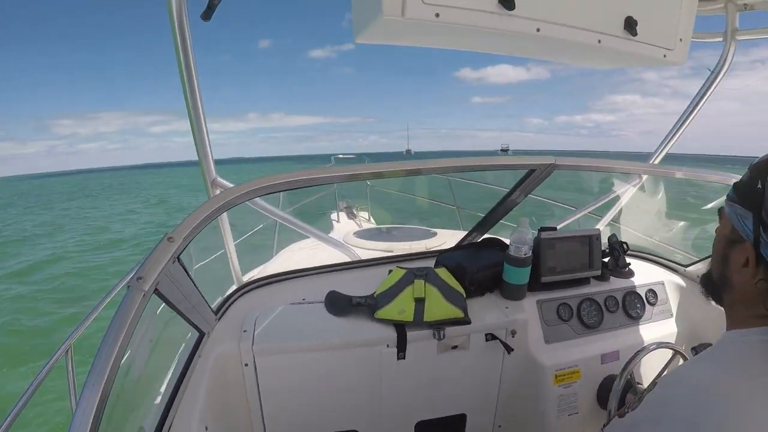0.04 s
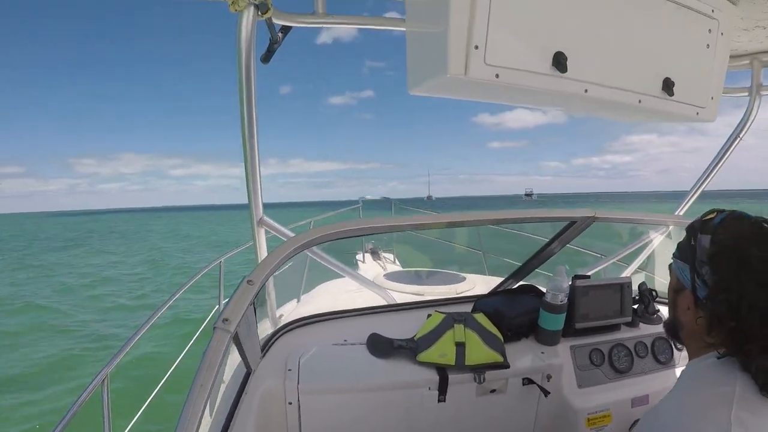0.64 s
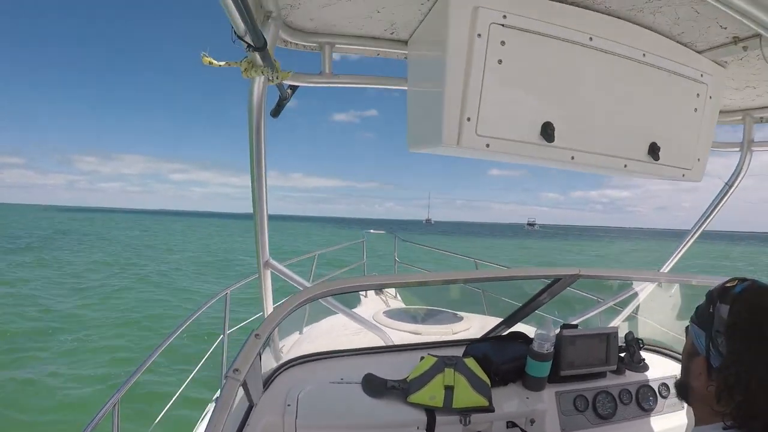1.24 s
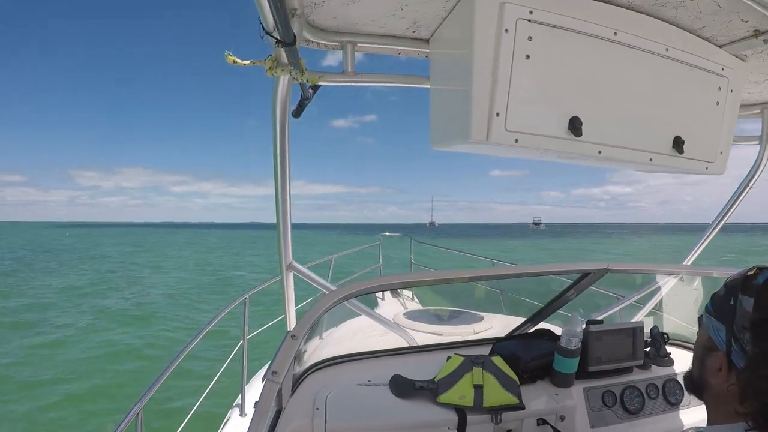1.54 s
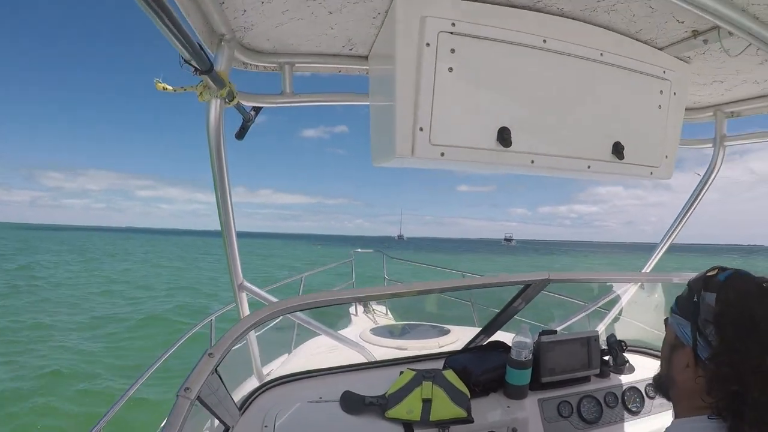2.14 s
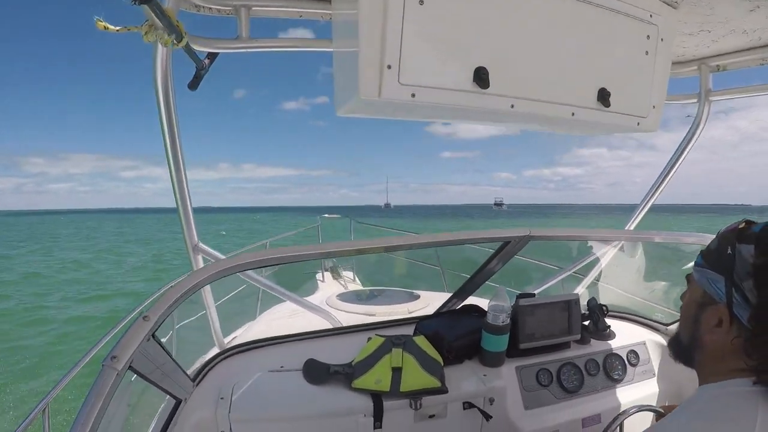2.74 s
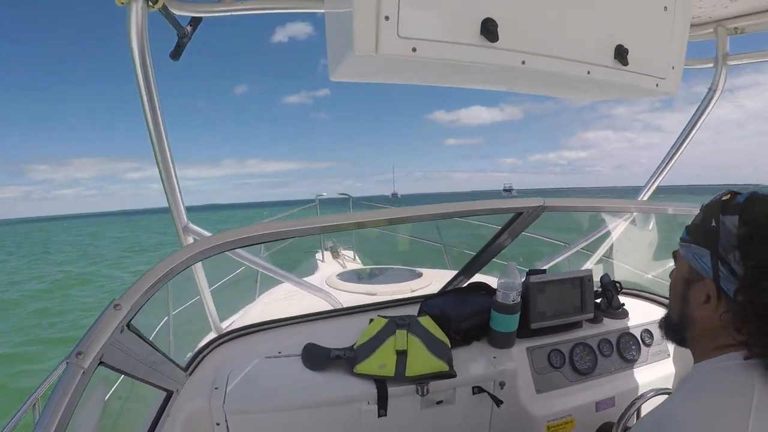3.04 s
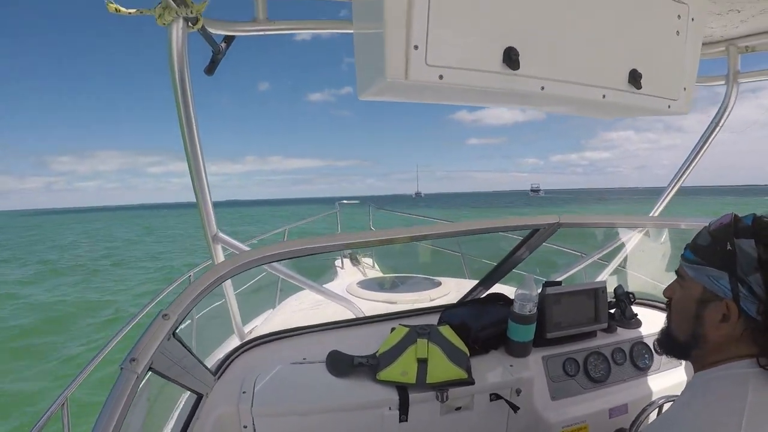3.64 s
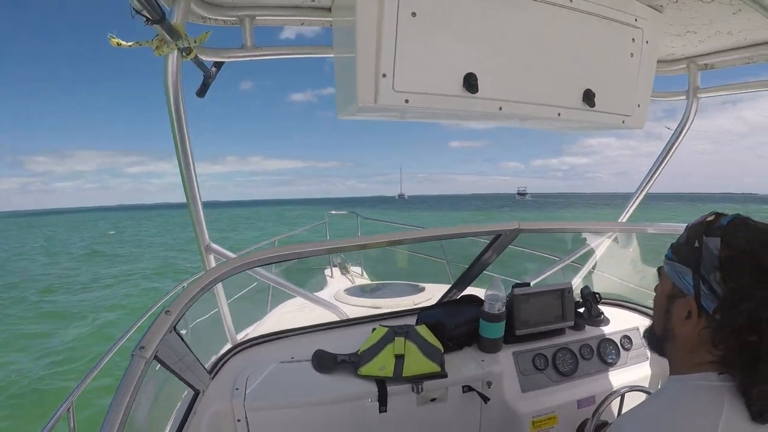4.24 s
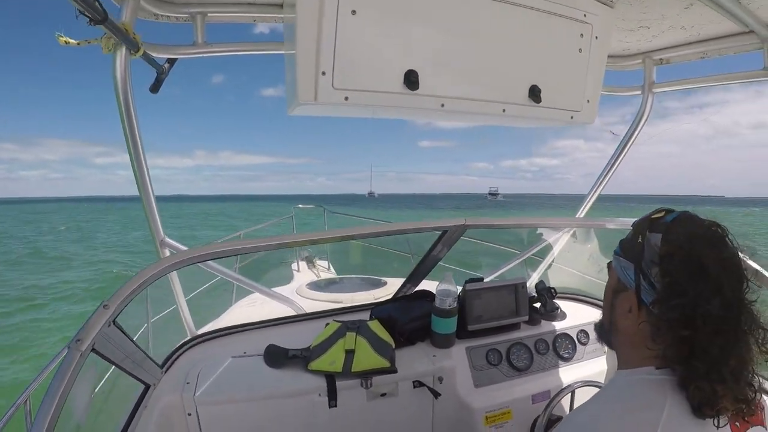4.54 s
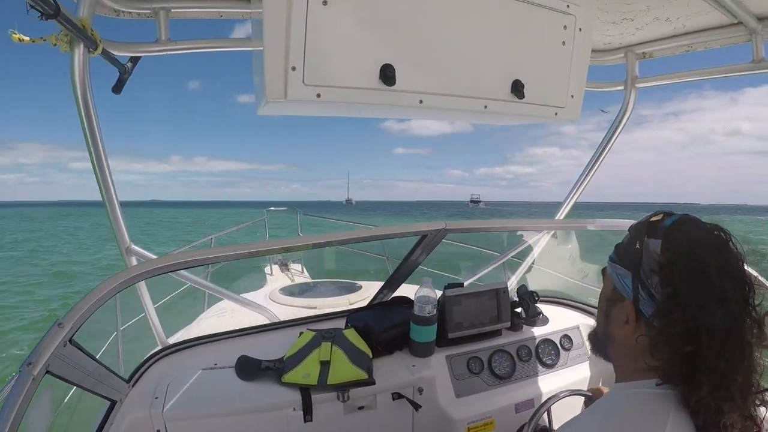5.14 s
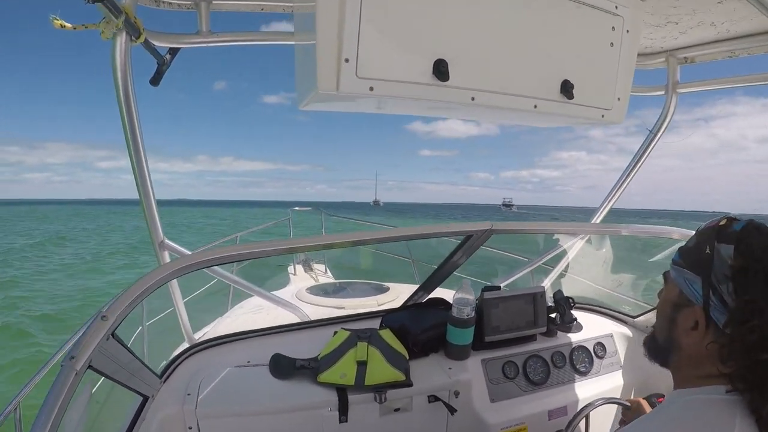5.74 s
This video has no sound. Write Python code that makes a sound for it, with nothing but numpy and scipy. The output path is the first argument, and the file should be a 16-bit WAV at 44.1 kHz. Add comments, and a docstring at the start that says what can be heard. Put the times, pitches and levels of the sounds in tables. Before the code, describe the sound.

A motorboat runs at speed over light chop for about six seconds, heard from one microphone behind the windscreen. Low wind rumble is the closest and loudest sound throughout. In the first half second it breaks into quick ragged thumps and crackles, then it eases, with a brief lull around 1.6 seconds. From about 2.5 seconds the buffeting grows harder and denser, with strong gusts near 2.7, 3.5, 4.6 and 5.4 seconds, and it carries on to the end. Further back, the engine holds a steady low exhaust drone with a thin, fluttering gear whine above it, which comes forward around 1, 4 and 5.4 seconds. Water rushes evenly along the hull the whole time. Spray from the bow adds a softer high hiss that swells quickly and falls away, most clearly near 1, 1.7, 2.7 and 4.4 seconds.

```python
"""Wind rumbles on one microphone under the hardtop of a motorboat running at speed over light chop.
The microphone sits behind the windscreen; whenever it loses that shelter, eddies strike it and
the wind tears into short ragged buffets. Further back, the engine's gears whine over the exhaust
drone, water rushes along the hull, and spray thrown up by the bow hisses in swells."""
import sys
import numpy as np
from scipy import signal
from scipy.fft import rfft, irfft, next_fast_len
from scipy.io import wavfile
from scipy.ndimage import uniform_filter1d

SR = 44100
rng = np.random.default_rng(int(sys.argv[2]) if len(sys.argv) > 2 else 0)


def materialize(psi):
    """Save the field psi as 16-bit PCM at rate SR to the path in sys.argv[1].

    A 1-D psi becomes a single channel; in a 2-D psi each row is a channel.
    """
    bounded = np.clip(np.atleast_2d(psi).T, -1, 1)
    quanta = np.round(bounded * 32767).astype(np.int16)
    wavfile.write(sys.argv[1], SR, quanta)


N = 264145
TIME = np.arange(N) / SR
FFT_SIZE = 2 * next_fast_len(N // 2 + 1)
BIN_HZ = np.maximum(np.arange(FFT_SIZE // 2 + 1) * SR / FFT_SIZE, 1)

# Wind getting past the windscreen, relative to a full gust: time_s, level_db
GUST_CURVE = [(0, -13.5), (.22, -12), (.5, -19.5), (.75, -15), (1.38, -10), (1.47, -18.5), (1.62, -34),
              (1.72, -11.5), (2.2, -15.5), (2.7, -4.5), (3.1, -8.5), (3.55, -2.5), (4.1, -7.5), (4.48, -7),
              (4.62, 0.5), (5.13, -5), (5.4, -0.5), (6, -5.5)]
# Brief surges and lulls at the microphone: centre_s, rumble_db, buffet_db, half_width_s
SURGES_AND_LULLS = [(.66, -3, -3, .08), (0.857, -3, -9, 0.026), (1.091, -1, -1.5, 0.028),
                    (1.335, -0.5, 2.5, 0.12), (1.497, -4, -4.5, 0.052), (1.618, -4.5, -15, .03),
                    (2.69, -0.5, 6.5, 0.046), (3.026, -4.5, 2, 0.043), (3.096, -2.5, -7, 0.033),
                    (3.65, 1, -3, 0.026), (3.758, -2, -2.5, .025), (3.838, -3, -13, 0.043),
                    (4.08, -1, -7, .04), (4.207, -5, 2.5, .03), (4.282, -2.5, -6, 0.038),
                    (4.591, -2.5, 4, .04), (5.14, -6.5, -8, 0.026), (5.264, -2, 0.5, .05),
                    (5.412, -4, 4, 0.031), (5.713, 1, 2.5, 0.095), (5.924, 0.5, 0, .04)]
# The hardest eddies to hit the microphone: centre_s, crackle_db, thump_db, half_width_s, top_hz
HARD_EDDIES = [(0.037, -18.5, -21, 0.0025, 1490), (0.058, -25, -18.5, 0.013, 1600),
               (0.078, -36, -25, 0.0074, 1500), (0.086, -22, -16, 0.0035, 1470),
               (0.113, -24, -14, 0.0045, 1200), (0.128, -21, -18, 0.0037, 1050),
               (0.144, -13.5, -13, 0.0023, 990), (0.154, -16.5, -16.5, 0.0041, 1700),
               (0.18, -29, -8.5, 0.0036, 1800), (0.206, -19.5, -20, 0.0036, 1860),
               (0.23, -24, -14, 0.0026, 2400), (0.262, -18, -23, 0.0013, 2100),
               (0.266, -17, -9.5, 0.005, 2000), (0.285, -20, -19, 0.0061, 1400),
               (0.372, -19, -8.5, 0.0011, 1790), (0.403, -23.5, -11.5, 0.0049, 2650),
               (0.551, -17, -18, 0.0032, 1750), (1.158, -20, -32, 0.0036, 1300),
               (1.345, -25, -13, 0.0014, 1400), (1.938, -26, -14, 0.0061, 1400),
               (2.372, -19, -10.5, 0.004, 1700), (2.407, -24, -14.5, 0.0042, 1200),
               (2.547, -23, -18, 0.009, 1900), (2.557, -15, -19, 0.0045, 1476),
               (2.603, -20, -14, 0.003, 1290), (2.613, -22, -26, 0.0027, 1050),
               (2.679, -21.5, -20, 0.003, 1500), (2.695, -20, -8, 0.0061, 1300),
               (2.722, -15, -14, 0.002, 1710), (2.738, -24, -10.5, 0.011, 1500),
               (2.8, -31, -28, 0.0027, 1100), (2.807, -28, -9, 0.0035, 1000),
               (2.851, -21, -14.5, 0.0029, 1700), (2.868, -15.5, -19, 0.005, 1200),
               (2.919, -17.5, -34, 0.0028, 1094), (2.954, -18, -13.5, 0.0042, 1200),
               (3.001, -18.5, -5.5, 0.0046, 1300), (3.017, -22, -8, .003, 1200),
               (3.061, -21, -10.5, 0.0029, 1200), (3.071, -17, -20, .005, 1100),
               (3.104, -23.5, -15.5, 0.0046, 1200), (3.115, -19, -15.5, 0.0017, 1100),
               (3.143, -16.5, -18, 0.0035, 1180), (3.154, -22, -21, 0.0026, 900),
               (3.168, -18, -15.5, .002, 1000), (3.178, -18, -11.5, 0.0067, 1100),
               (3.204, -24, -22, 0.0025, 1500), (3.24, -14.5, -28, 0.0046, 1793),
               (3.271, -21, -15, 0.008, 1600), (3.29, -24, -9.5, 0.0025, 1300),
               (3.303, -16.5, -6, 0.0024, 1400), (3.332, -13.5, -22, 0.002, 1300),
               (3.357, -24, -17, .004, 1200), (3.388, -20.5, -27, 0.0033, 900),
               (3.41, -18, -25, 0.0048, 960), (3.423, -23.5, -19, 0.0042, 1100),
               (3.471, -15.5, -18, 0.0056, 1400), (3.488, -25, -9, .002, 1600),
               (3.501, -19.5, -16, 0.0032, 2000), (3.516, -17.5, -18, 0.0025, 1400),
               (3.535, -18, -27, 0.0067, 1910), (3.554, -15.5, -17, 0.0087, 1900),
               (3.589, -22, -17, 0.015, 1300), (3.654, -25, -9, 0.0032, 1690),
               (3.726, -19, -9.5, 0.0036, 1200), (3.765, -17, -14, 0.005, 1100),
               (3.783, -17, -12, 0.0079, 1200), (3.912, -14, -13, 0.003, 2000),
               (4.017, -21, -21, 0.0029, 1110), (4.336, -26, -12, 0.0075, 1200),
               (4.445, -17.5, -20, 0.0044, 1486), (4.558, -22, -24, .003, 1300),
               (4.57, -18, -18, 0.0031, 1000), (4.587, -17.5, -9, 0.0065, 1116),
               (4.61, -15.5, -7, 0.004, 2267), (4.625, -19, -5, 0.002, 1710),
               (4.65, -13, -27, 0.0022, 1200), (4.657, -12.5, -6.5, 0.0055, 1700),
               (4.688, -17.5, -22, 0.0044, 1300), (4.719, -23, -14, .003, 1200),
               (4.727, -15, -13, 0.0027, 1900), (4.734, -13.5, -16, 0.0059, 1000),
               (4.744, -20, -9, 0.0017, 1100), (4.796, -19.5, -11, 0.0059, 1500),
               (4.809, -14.5, -10.5, 0.0037, 1600), (4.841, -20.5, -22, 0.0075, 900),
               (4.869, -17, -19, 0.0086, 1400), (4.918, -25, -8.5, 0.0018, 1000),
               (4.932, -22, -21, 0.0024, 1000), (4.97, -21.5, -12.5, 0.0052, 1920),
               (5.003, -12.5, -13.5, 0.0065, 1116), (5.079, -15, -9, 0.0016, 2200),
               (5.156, -19.5, -23, 0.0045, 1225), (5.17, -18, -9, 0.0027, 2200),
               (5.188, -20, -19.5, 0.0053, 1300), (5.217, -21, -23, 0.0024, 1300),
               (5.235, -17, -21, 0.0049, 1512), (5.28, -14.5, -5.5, 0.0026, 1200),
               (5.304, -13.5, -26, 0.0083, 1390), (5.359, -19.5, -9, 0.0021, 1700),
               (5.383, -32, -12, .004, 1300), (5.402, -24, -13, 0.0021, 1900),
               (5.416, -30, -12, 0.0033, 1000), (5.434, -18, -13, .004, 1100),
               (5.453, -17, -20, 0.0081, 2090), (5.468, -15, -10, 0.0018, 1204),
               (5.491, -25, -20, 0.0028, 1400), (5.507, -17.5, -18, 0.0037, 1400),
               (5.52, -27, -24, 0.0018, 1200), (5.568, -15.5, -10.5, 0.0063, 1182),
               (5.628, -17, -21, 0.0027, 930), (5.697, -17, -17.5, 0.0053, 1200),
               (5.727, -11.5, -15, 0.0017, 1002), (5.741, -23, -16, 0.002, 1200),
               (5.788, -21, -19, 0.0041, 1500), (5.821, -20, -10, 0.0031, 1400),
               (5.829, -20, -18, .002, 1500), (5.855, -15, -18, 0.003, 1200),
               (5.88, -12.5, -10.5, 0.009, 1800), (5.936, -17, -6, 0.002, 1500),
               (5.941, -18.5, -11, 0.0043, 1820), (5.971, -17.5, -18, 0.0055, 1700)]
# Spectra of large, middling and small eddies, and of one eddy's puff: frequency_hz, relative_db
RUMBLE_SPECTRUM = [(8, -21), (18, -0.5), (32, -1.5), (70, -1), (95, -2), (125, -7), (170, -18.5),
                   (300, -33.5), (600, -68.5)]
BUFFET_SPECTRUM = [(60, -27.5), (100, -3.5), (135, 0), (175, -1.5), (240, -6), (320, -13), (450, -20.5),
                   (800, -36), (2000, -60)]
TEAR_SPECTRUM = [(180, -15), (330, 1), (480, -0.5), (800, 0.5), (1150, -11), (1700, -17.5), (2500, -19),
                 (4000, -39.5), (8000, -61.5)]
PUFF_SPECTRUM = [(130, 3.5), (300, 10.5), (550, 12.5), (1100, -1.5), (1700, -20.5), (2400, -7),
                 (3400, -16.5), (8000, -40)]
# The engine's gear whine: time_s, pitch_hz, level_db
GEAR_WHINE = [(0, 854.6, -48), (.75, 856, -54), (1.05, 856, -40), (1.35, 859, -49), (2.1, 862.4, -52),
              (2.6, 866, -43.5), (3.35, 865.5, -46), (3.72, 862, -43), (3.95, 864, -41), (4.2, 865, -51.5),
              (5, 863.7, -50), (5.4, 867, -40.5), (6, 870, -53)]
# Its overtones, heard behind the screen and in the open: multiple, sheltered_db, open_db
WHINE_OVERTONES = [(2, -64.5, -51.5), (3, -67, -60)]
# Exhaust drone: multiple_of_firing_rate, level_db
EXHAUST_ORDERS = [(1, -29), (2, -40), (3, -46.5), (4, -60), (5, -55), (6, -52.5), (8, -58), (9, -62.5),
                  (13, -67)]
# Sheets of spray thrown as the bow meets a wave: peak_s, level_db, hold_s
SPRAY_SHEETS = [(.18, -51.5, .15), (.4, -47.5, 0.11), (0.947, -39.5, 0.088), (1.35, -46, 0.07),
                (1.734, -38, 0.12), (2.043, -42.5, 0.09), (2.693, -40.5, 0.081), (3.02, -43.5, .35),
                (3.88, -42.5, 0.051), (4.35, -40.5, .2), (4.88, -46, 0.06), (5.06, -42, 0.025),
                (5.42, -47, .16), (5.88, -46.5, 0.039)]
# Spectra of water along the hull and of spray: frequency_hz, relative_db
HULL_SPECTRUM = [(120, 8), (300, 9.5), (520, -2.5), (700, 0), (900, 3), (1050, -4), (1500, -3.5),
                 (2000, -5), (2550, -7.5), (3100, -18.5), (4000, -19), (7000, -46)]
SPRAY_SPECTRUM = [(1000, -10.5), (2100, -18), (3000, -9.5), (3500, -8.5), (3900, -3), (4350, 2),
                  (5100, 0.5), (6000, 1), (6400, -2), (6900, -12), (7600, -22), (8700, -24), (10200, -32),
                  (11600, -49.5)]


def wind(gust_db, rumble_db=-12.5, buffet_db=-18, tear_db=-33.5):
    """Large eddies rumble on the microphone and break up in fits that stir all the smaller ones."""
    rumble_surge_db, buffet_surge_db = surges()
    stir_db = gust_db + 2.0 * np.tanh(drift(rate_hz=15))
    fits = 2 * np.tanh(drift(rate_hz=62) / 2)
    rumble = steadied(noise(RUMBLE_SPECTRUM), window_s=0.034, share=1.0)
    buffet = steadied(noise(BUFFET_SPECTRUM) * from_db(5.5 * fits), window_s=0.059, share=1.0)
    tear = steadied(noise(TEAR_SPECTRUM) * from_db(4.0 * fits), window_s=0.058, share=0.76)
    rumble *= from_db(rumble_db + rumble_surge_db + 1.5 * drift(rate_hz=24))
    buffet *= from_db(buffet_db + buffet_surge_db + 0.53 * stir_db)
    tear *= from_db(tear_db + 0.48 * buffet_surge_db + 0.71 * stir_db)
    return rumble + buffet + tear


def surges():
    """The wind surges or drops for a moment: level changes of rumble and buffeting, in dB."""
    centre_s, rumble_db, buffet_db, half_width_s = np.transpose(SURGES_AND_LULLS)
    shapes = np.exp(-((TIME - centre_s[:, None]) / half_width_s[:, None]) ** 2)
    return rumble_db @ shapes, buffet_db @ shapes


def eddies(gust_db, puff_db=-5.5, jolt_db=12.0, thump_stretch=1.38):
    """An eddy hits the microphone: a low thump around a run of jolts and a puff of turbulence."""
    out = np.zeros(N)
    turbulence = steadied(noise(PUFF_SPECTRUM), window_s=0.0052, share=0.53)
    swirl = steadied(noise(BUFFET_SPECTRUM), window_s=0.031, share=0.39)
    all_eddies = np.vstack([HARD_EDDIES, lesser_eddies(gust_db)])
    for centre_s, crackle_db, thump_db, half_width_s, top_hz in all_eddies:
        centre = int(centre_s * SR)
        near = slice(max(centre - SR // 20, 0), centre + SR // 20)
        since_s = TIME[near] - centre_s
        half_width_s = max(half_width_s, 0.001)
        passing = since_s / half_width_s
        puff = from_db(puff_db) * turbulence[near] * np.exp(-passing ** 2)
        jolts = from_db(jolt_db) * pressure_jolts(since_s, half_width_s)
        crackle = lowpass(puff + jolts, min(top_hz, SR / 4))
        thump = swirl[near] * np.exp(-(passing / thump_stretch) ** 2)
        out[near] += from_db(crackle_db) * crackle + from_db(thump_db) * thump
    return out


def lesser_eddies(gust_db, per_s=50, spread_db=8, clearance_s=0.012):
    """Rows like HARD_EDDIES for the eddies in between, which hit harder as the wind rises."""
    count = int(per_s * N / SR) + 1
    timing, strength, width, brightness = rng.standard_normal((count, 4)).T
    centre_s = (np.arange(count) + 0.5 + 0.4 * timing) / per_s
    crackle_db = -22.5 + 1.12 * np.interp(centre_s, TIME, gust_db) + spread_db * np.tanh(strength)
    thump_db = crackle_db - 3
    half_width_s = 0.002 * np.exp(0.12 * width)
    top_hz = 1420 * np.exp(0.46 * brightness)
    rows = np.column_stack([centre_s, crackle_db, thump_db, half_width_s, top_hz])
    to_hard_eddy_s = np.abs(centre_s[:, None] - np.array(HARD_EDDIES)[:, 0]).min(axis=1)
    return rows[(to_hard_eddy_s > clearance_s) & (centre_s > 0) & (centre_s < N / SR)]


def pressure_jolts(since_s, half_width_s, gap_s=0.0036, leak_hz=400, flank_db=-4.0, count=9):
    """An eddy breaks into pressure jumps, hardest at its heart; the microphone port leaks each away."""
    place = np.arange(count) - count // 2
    jitter, spread_db, polarity = rng.uniform(-1, 1, (3, count))
    on_flank = place != 0
    start_s = gap_s * (place + 0.3 * jitter * on_flank)
    span_s = half_width_s * np.where(place < 0, 1.0, 1.29)  # dies down slower than it builds
    envelope = np.exp(-(start_s / span_s) ** 4)
    height = np.sign(polarity) * from_db(on_flank * (flank_db + spread_db)) * envelope
    age = 2 * np.pi * leak_hz * np.maximum(since_s - start_s[:, None], 0)
    return height @ ((age > 0) * (1 - age) * np.exp(-age))


def microphone_overload(air, ceiling=0.88, top_hz=3070):
    """The microphone rounds off the strongest pushes of air, and their treble is rolled away."""
    rounded = air / (1 + (air / ceiling) ** 4) ** 0.25
    return lowpass(rounded, top_hz)


def engine(gust_db, full_shelter_db=-15, flutter_db=3.0, whine_cycles_per_firing=11.7):
    """Gear whine and exhaust drone follow one slightly unsteady shaft; moving air makes them flutter."""
    pitch_hz, whine_db = in_time(GEAR_WHINE)
    exposure = np.clip(1.0 - gust_db / full_shelter_db, 0, 1)  # 0 behind the screen, 1 in the open
    shaft_waver = 0.0028 * drift(rate_hz=14)
    phase = 2 * np.pi * np.cumsum(pitch_hz * (1 + shaft_waver)) / SR
    gain = from_db(whine_db + flutter_db * drift(rate_hz=24))
    out = gain * np.sin(phase + 0.68 * drift(rate_hz=40))
    for multiple, sheltered_db, open_db in WHINE_OVERTONES:
        level_db = sheltered_db + exposure * (open_db - sheltered_db)
        gain = from_db(level_db + flutter_db * drift(rate_hz=11))
        out += gain * np.sin(multiple * (phase + 0.45 * drift(rate_hz=47)))
    for order, level_db in EXHAUST_ORDERS:
        gain = from_db(level_db + 4.5 * drift(rate_hz=30))
        out += gain * np.sin(order * phase / whine_cycles_per_firing)
    return np.sqrt(2) * out  # the levels are rms


def water(hull_db=-36.0, splatter_db=0.69):
    """Water rushes evenly along the hull and swells a little with each sheet of hissing spray."""
    spray_db = spray_level()
    hull = noise(HULL_SPECTRUM) * from_db(hull_db + 0.34 * (spray_db - spray_db.mean()))
    spray = noise(SPRAY_SPECTRUM) * from_db(spray_db + splatter_db * drift(rate_hz=59))
    return hull + spray


def spray_level(wake_db=-44, rise_s=0.12, fall_s=0.3):
    """Spray level in dB: each sheet climbs quickly, holds, then rains down over the steady wake."""
    power = from_db(wake_db) ** 2
    for peak_s, level_db, hold_s in SPRAY_SHEETS:
        climb = np.exp(-(np.minimum(TIME - peak_s, 0) / rise_s) ** 2 / 2)
        fall = np.exp(-np.maximum(TIME - peak_s - hold_s, 0) / fall_s)
        power = power + (from_db(level_db) * climb * fall) ** 2
    return 10 * np.log10(power)


def from_db(db):
    """Decibels to gain."""
    return 10 ** (np.asarray(db) / 20)


def rms_one(x):
    """Scale to rms 1."""
    return x / np.sqrt(np.mean(x ** 2) + 1e-20)


def lowpass(x, top_hz):
    """Roll off the treble at 24 dB an octave."""
    return signal.sosfilt(signal.butter(4, top_hz, fs=SR, output="sos"), x)


def in_time(rows):
    """Each column of a curve, at every sample."""
    time_s, *columns = np.transpose(rows)
    return [np.interp(TIME, time_s, column) for column in columns]


def drift(rate_hz):
    """Smooth random wander, mostly slower than rate_hz; rms 1."""
    white = rfft(rng.standard_normal(FFT_SIZE))
    return rms_one(irfft(white / (1 + (BIN_HZ / rate_hz) ** 2))[:N])


def noise(spectrum):
    """Noise with the given spectrum, dying away beyond its ends; rms 1."""
    hz, level_db = np.transpose(spectrum)
    gain = from_db(np.interp(np.log(BIN_HZ), np.log(hz), level_db))
    skirts = np.minimum(BIN_HZ / hz[0], 1) ** 2 * np.minimum(hz[-1] / BIN_HZ, 1) ** 2
    return rms_one(irfft(rfft(rng.standard_normal(FFT_SIZE)) * gain * skirts)[:N])


def steadied(x, window_s, share):
    """Take a share of the chance swells out of a sound; rms 1."""
    size = int(window_s * SR)
    power = uniform_filter1d(uniform_filter1d(x ** 2, size), size)
    return rms_one(x / (np.maximum(power, 0) + 1e-9) ** (share / 2))


def scene():
    """Wind right on the microphone, with the engine and the water behind it; mono."""
    gust_db, = in_time(GUST_CURVE)
    boat = engine(gust_db) + water()
    air = microphone_overload(wind(gust_db) + eddies(gust_db))
    return (air + boat)[None]


def record(dry, stopband_hz=15700):
    """The recorder cuts the highest treble steeply."""
    return signal.sosfilt(signal.cheby2(12, 70, stopband_hz, fs=SR, output="sos"), dry)


dry = scene()
out = record(dry)
materialize(out)
```